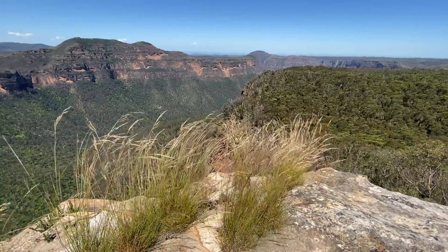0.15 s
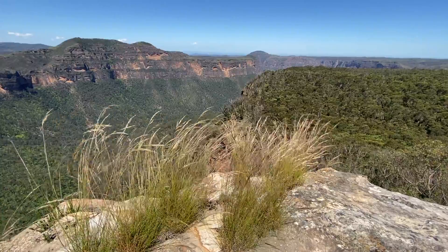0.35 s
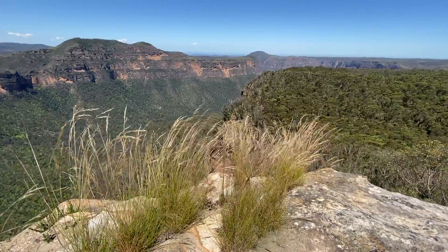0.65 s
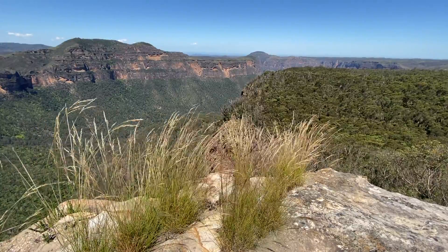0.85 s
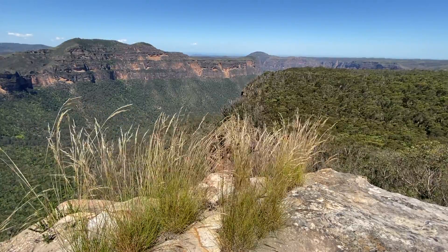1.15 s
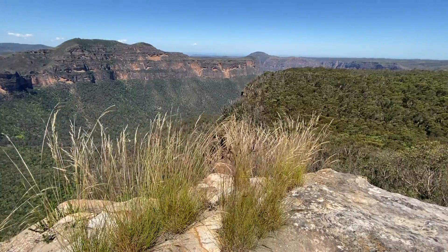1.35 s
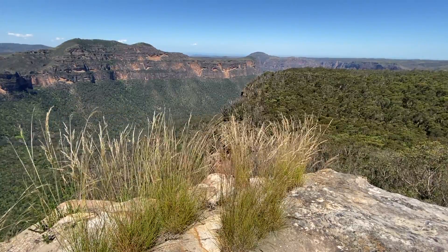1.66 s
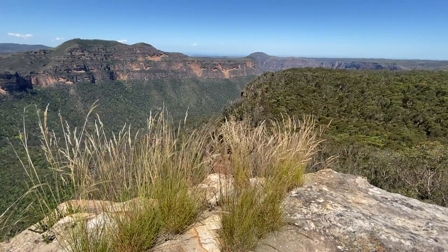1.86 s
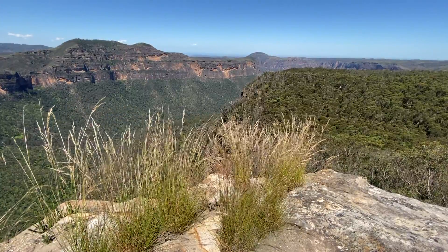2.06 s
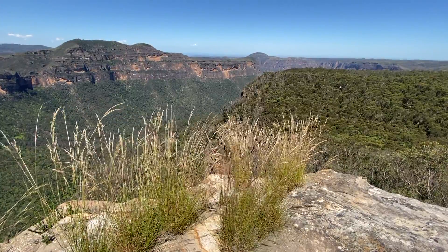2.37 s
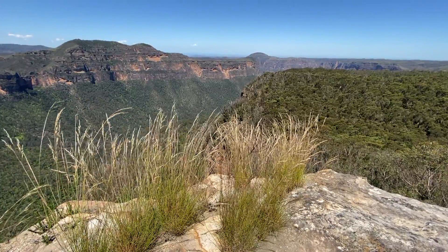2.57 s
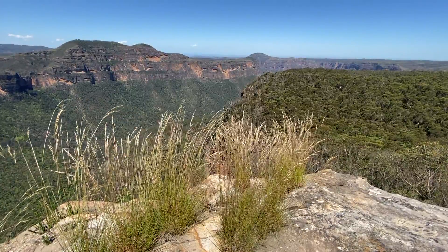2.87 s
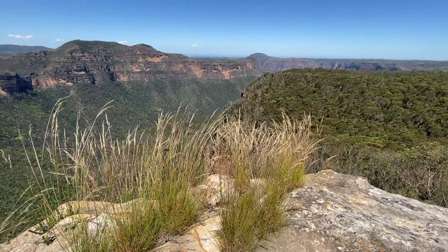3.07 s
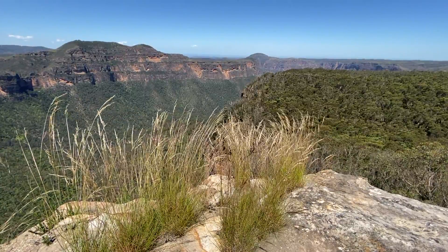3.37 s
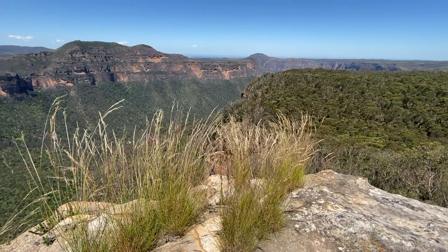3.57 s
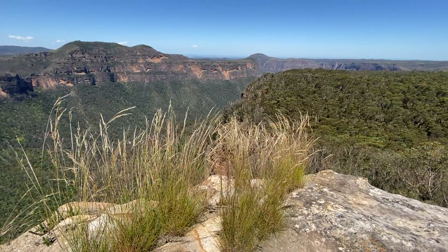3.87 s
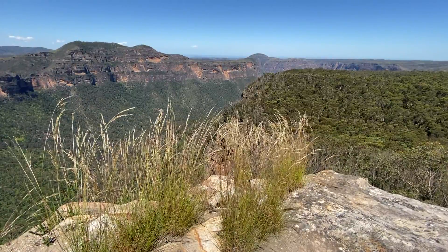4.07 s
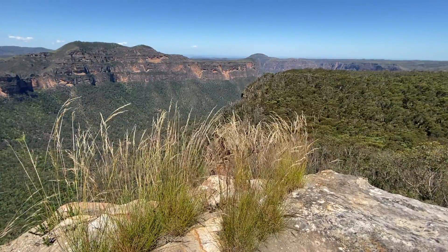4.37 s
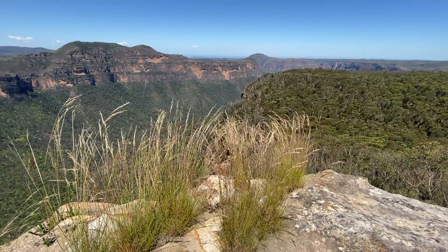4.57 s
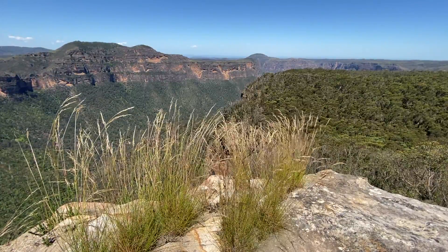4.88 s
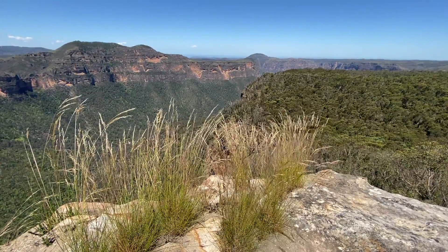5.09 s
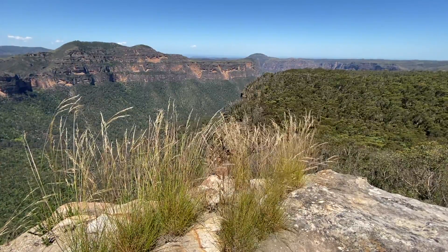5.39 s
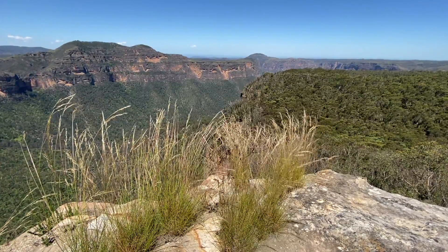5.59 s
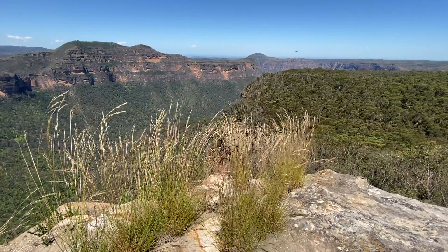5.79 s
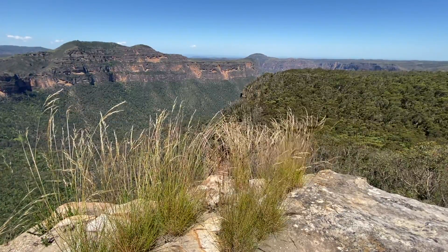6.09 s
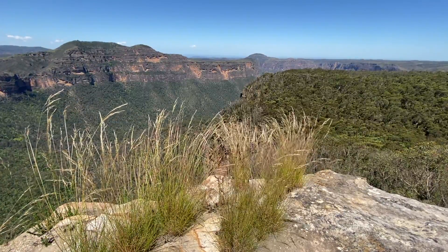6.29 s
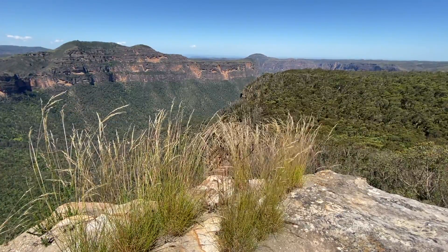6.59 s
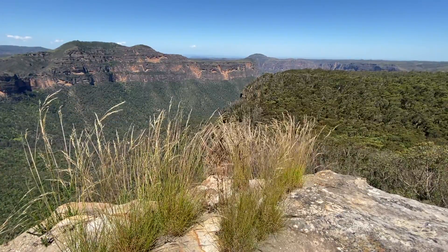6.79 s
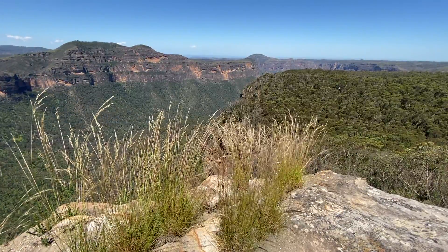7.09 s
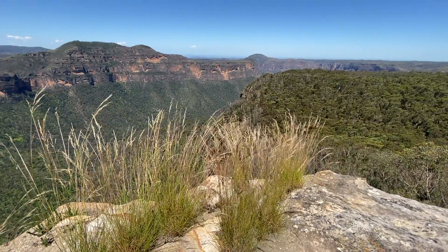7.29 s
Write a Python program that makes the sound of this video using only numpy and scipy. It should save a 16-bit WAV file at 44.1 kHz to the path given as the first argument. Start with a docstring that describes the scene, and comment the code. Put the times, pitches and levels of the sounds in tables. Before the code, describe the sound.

Outdoor stereo insect ambience in open air: sharp metallic cicada rasps near the left, brief at first and drawn out after the middle, with a softer cicada replying between them. Thin rhythmic katydid hiss stays above, distant insects shimmer below. Wind is light at first, then buffets the microphone in low uneven thumps, strongest around the middle, easing later with a few returning puffs.

```python
"""A cicada close by, louder on the left, sings short phrases and then long ones, heard from a clifftop
above a forested valley. A katydid in the grass lisps five times a second, very high; a chorus in the trees
swells and ebbs over a far drone, and a second cicada answers in the pauses. The cicadas are trains of ringing
clicks, the katydid is noise cut into file teeth. Wind, as shaped noise and short swings of pressure, rumbles,
flaps and thumps on the two microphone ports. Faint whistles, lone clicks and a passing fly come later."""
import sys
import numpy as np
from scipy import signal
from scipy.fft import rfft, irfft
from scipy.io import wavfile
from scipy.ndimage import uniform_filter1d

SR = 44100
rng = np.random.default_rng(int(sys.argv[2]) if len(sys.argv) > 2 else 0)


def unload_audio(sound):
    """Save the sound as a 16-bit wav file, at the path given as the first command line argument."""
    columns = np.transpose(np.atleast_2d(sound))
    # keep every value between -1 and 1, then stretch to whole-number steps
    steps = np.round(np.clip(columns, -1, 1) * 32767)
    wavfile.write(sys.argv[1], SR, steps.astype(np.int16))


N = 328545
T = np.arange(N) / SR  # time of each sample, s

# click pace of the near cicada, before its drag and unevenness: [t/s, rate/clicks per s]
CLICK_PACE = [(0, 194), (.45, 192), (1, 196), (1.5, 194.5), (2.05, 194.5), (2.55, 197), (4.65, 196.5),
              (4.95, 189), (5.75, 184), (5.88, 187), (6.301, 187), (6.6, 183.5), (7.45, 186.5)]


def undb(db):
    """Decibels to gain."""
    return 10 ** (np.asarray(db) / 20)


def unit(x):
    """Scale to rms 1."""
    return x / np.sqrt(np.mean(x ** 2))


def curves(table):
    """Each column of a table, joined by straight lines in time."""
    s, *columns = np.transpose(table)
    return [np.interp(T, s, c) for c in columns]


def colour(x, points):
    """Shape a sound by an outline of (f/Hz, level/dB), falling away beyond both ends; rms 1."""
    hz, db = np.transpose(points)
    f = np.maximum(np.fft.rfftfreq(N, 1 / SR), 1)
    skirt = np.minimum(f / hz[0], 1) ** 2 * np.minimum(hz[-1] / f, 1) ** 10
    outline = undb(np.interp(np.log(f), np.log(hz), db))
    return unit(irfft(rfft(x) * skirt * outline, N))


def walk(rate):
    """Random levels held 1 / rate s and smoothed twice; rms 1."""
    k = max(int(SR / rate), 2)
    steps = np.repeat(rng.standard_normal(N // k + 1), k)
    return unit(uniform_filter1d(uniform_filter1d(steps, k), k)[:N])


def drift(chance, size):
    """Smooth a run of random values twice over size steps; rms 1."""
    return unit(uniform_filter1d(uniform_filter1d(chance, size), size))


def stereo_noise(likeness):
    """Two noises with the given correlation."""
    mid, side = rng.standard_normal((2, N))
    c = np.clip(likeness, -1, 1)
    return (np.sqrt(1 + c) * mid + np.sqrt(1 - c) * np.array([side, -side])) / np.sqrt(2)


def pan(x, balance_db):
    """Tip a sound to the left by left minus right dB, keeping its power."""
    gains = np.array([undb(balance_db / 2), undb(-balance_db / 2)]).reshape(2, -1)
    return x * gains / np.sqrt(np.mean(gains ** 2, axis=0))


def ports(x, lag):
    """The sound reaches the left port lag samples after the right."""
    left, right = np.broadcast_to(x, (2, N))
    delay = np.exp(-2j * np.pi * lag * np.fft.rfftfreq(N))
    return np.array([irfft(rfft(left) * delay, N), right])


def clicks(times, sizes, size=8):
    """Impulses placed between samples by a windowed sinc."""
    at = np.asarray(times)[:, None] * SR
    index = at.astype(int) + np.arange(1 - size, size + 1)
    window = np.sinc((index - at) / size)
    taps = np.sinc(index - at) * window * np.asarray(sizes)[:, None]
    inside = (index >= 0) & (index < N)
    return np.bincount(index[inside], taps[inside], N)


def scatter(x, t60):
    """Diffuse returns from rock and foliage, unrelated at the two ports, dying 60 dB in t60 s."""
    t = T[:int(t60 * SR)]
    tail = rng.standard_normal((2, len(t))) * np.exp(-np.log(1000) * t / t60)
    return np.array([unit(signal.fftconvolve(x, h)[:N]) for h in tail]) * np.std(x)


def surge_db():
    """Brief surges of effort: they raise the near cicada's level and the pitch of both cicadas."""
    # surges: [t/s, half length/s, rise/dB]
    surges = [(0.323, 0.11, 1.5), (4.665, 0.18, 3.5), (5.713, 0.27, 2), (6.712, 0.13, 4)]
    return sum(db * np.exp(-((T - s) / width) ** 2) for s, width, db in surges)


def tymbals(start, end, db, pace=1, slow=.13, warm_s=.06, limp=0.0165, first_limp=0.252, settle_s=0.0423,
            tire=0.032, tire_s=.07, jitter=0.0025, weak_db=-0.8, scatter_db=0.84, stutter_s=.03,
            shy_db=-2.5, fade_db=-1.5, count=400):
    """One phrase as rows (s, size, side): two tymbals buckle in turn, halting, then fast, then tiring."""
    pace_wander, limp_wander = .0045, .018  # share of a click period
    chance, k = rng.standard_normal((count, 4)), np.arange(count)
    s, rate = np.transpose(CLICK_PACE)
    age, side = k / rate.mean(), k % 2
    warming = np.exp(-age / warm_s)
    tired = np.exp(np.minimum(start + age - end, 0) / tire_s)
    drag = slow * warming + tire * tired + pace_wander * drift(chance[:, 2], size=10)
    # the lag between the tymbals groups the clicks in pairs
    lag = limp + first_limp * np.exp(-age / settle_s) + limp_wander * drift(chance[:, 3], size=16)
    uneven = lag * (-1) ** k
    period = (1 + drag + uneven + jitter * chance[:, 0]) / np.interp(start + age, s, rate * pace)
    times = start + np.cumsum(period) - period[0]
    # at first the second tymbal misses about half its turns
    caught = (age > stutter_s) | (side == 0) | (rng.random(count) < .5)
    level_db = db + shy_db * warming + fade_db * tired + weak_db * side + scatter_db * chance[:, 1]
    return np.transpose([times, undb(level_db), side])[(times < end) & caught]


def click_ring(t, modes, bloom_s, tuning, order=3):
    """Ring of one tymbal click: the abdomen fills over about two milliseconds, then empties."""
    bloom = (t / bloom_s) ** order * np.exp(-t / bloom_s)
    return bloom * sum(undb(db) * np.sin(2 * np.pi * hz * tuning * t) for hz, db in modes)


def sing(beats, modes, bloom_s, detune, stray=0.0013, bloom_spread=0.045):
    """Two tymbals, tuned a little apart, ring the abdomen; harder clicks ring higher."""
    tension_per_db = 0.0066  # rise in pitch, as a share, for each dB of effort
    times, sizes, side = beats.T[:, :, None]
    chance = rng.standard_normal((len(beats), 2)).T[:, :, None]
    effort_db = 20 * np.log10(sizes) + np.interp(times, T, surge_db())
    tension = tension_per_db * (effort_db - effort_db.mean())
    tuning = 1 + detune * (-1) ** side + tension + stray * chance[0]
    index = np.ceil(times * SR).astype(int) + np.arange(SR // 80)
    bloom = bloom_s * np.exp(bloom_spread * chance[1])  # no two clicks are equally sharp
    rings = click_ring(index / SR - times, modes, bloom, tuning)
    # energy of each click set by its size and the mean click period
    period = SR / np.mean(CLICK_PACE, axis=0)[1]
    rings = rings * sizes * np.sqrt(period / np.sum(rings ** 2, axis=1, keepdims=True))
    inside = (index >= 0) & (index < N)
    return np.bincount(index[inside], rings[inside], N)


def snaps(beats, snap_s=0.0008):
    """Each buckling sheds a millisecond or two of dry crackle."""
    # dry snap of a buckling tymbal: [f/Hz, level/dB]
    snap_colour = [(3150, -13.5), (3430, 1.5), (3650, 1.5), (4000, -7), (4900, -4), (5300, -5.5),
                   (5680, -1.5), (5920, -8), (6300, -14), (6800, -33.5), (7100, -21.5), (7600, -32),
                   (8400, -25), (8900, -20.5), (9500, -39)]
    t = T[:SR // 100]
    power = signal.fftconvolve(clicks(beats[:, 0], beats[:, 1] ** 2), t * np.exp(-t / snap_s))[:N]
    return colour(np.sqrt(np.abs(power)) * rng.standard_normal(N), snap_colour)


def cicada(gain_db=2.0, balance_db=11.0, snap_db=-16, snap_balance_db=2, near_db=-17, far_db=-24):
    """The near cicada: ringing clicks and their dry snaps, with faint returns from the cliff."""
    # phrases, level before gain and surges: [start t/s, end t/s, level/dB]
    phrases = [(-.15, 0.078, -38), (.197, .521, -37), (.809, 1.091, -41.5), (1.343, 1.612, -41),
               (1.859, 2.12, -40.5), (2.375, 2.623, -41), (2.89, 3.146, -41), (3.396, 3.68, -43.5),
               (3.94, 4.201, -41), (4.455, 5.956, -43), (6.08, 6.986, -44.5), (7.075, 7.455, -41.5)]
    # modes that each click rings: [f/Hz, level/dB]
    abdomen_modes = [(3900, -28), (4345, 4), (4640, -26), (5660, -28.5)]
    beats = np.concatenate([tymbals(start, end, db) for start, end, db in phrases])
    song = sing(beats, abdomen_modes, bloom_s=0.00081, detune=0.004)
    crackle = pan(snaps(beats), snap_balance_db) * np.std(song) * undb(snap_db)
    direct = ports(pan(song, balance_db) + crackle, lag=20.3)
    returns = undb(near_db) * scatter(song, t60=0.053) + undb(far_db) * scatter(song, t60=0.29)
    return undb(gain_db + surge_db()) * (direct + pan(returns, balance_db=5.5))


def katydid(gain_db=-2, tooth_hz=460, tooth_s=0.0015, opening_s=0.044, back_db=-14, rest_db=-77, sway_db=1):
    """Each closing wing drags a file over a scraper, swells and stops short; the opening is faint."""
    # closing strokes, level before gain: [end t/s, level/dB]
    strokes = [(0.148, -64), (0.345, -64.0), (0.536, -63), (0.736, -60), (0.924, -60.5), (1.116, -61),
               (1.302, -61.5), (1.508, -60.5), (1.705, -65), (1.9, -61.5), (2.098, -63), (2.302, -63),
               (2.494, -59), (2.687, -61.5), (2.885, -62.0), (3.065, -61.5), (3.261, -63), (3.462, -61.5),
               (3.647, -64.5), (3.854, -63.5), (4.033, -61), (4.23, -63.5), (4.438, -59.5), (4.617, -58),
               (4.821, -63.5), (5.017, -62.5), (5.211, -62), (5.407, -61.5), (5.609, -62.5), (5.802, -62.5),
               (5.977, -65), (6.175, -64.5), (6.378, -63), (6.579, -65.5), (6.773, -63), (6.974, -66),
               (7.17, -66), (7.377, -62.0)]
    # resonance of the wing: [f/Hz, level/dB]
    wing_colour = [(8500, -19), (10000, -6.5), (11700, 0), (13200, 0.5), (14900, 3), (16000, -6.5)]
    swell_s, hold_s, stop_s = 0.078, 0.037, .014
    grip_times = [-hold_s - swell_s, -hold_s, -stop_s / 2, stop_s / 2]
    force = np.full(N, undb(rest_db))
    for end, db in strokes:
        near = np.abs(T - end) < .15
        t = T[near] - end
        closing = np.sin(np.pi / 2 * np.interp(t, grip_times, [0, 1, 1, 0])) ** 2
        opening = undb(back_db) * np.exp(-(t / opening_s - 1) ** 2)
        force[near] += (closing + opening) * undb(db + gain_db)
    phase = np.cumsum(tooth_hz * (1 + 0.1 * walk(300))) / SR % 1
    tooth_decay = np.exp(-phase / tooth_hz / tooth_s)
    teeth = tooth_decay * rng.standard_normal(N) * undb(sway_db * walk(50))
    return ports(colour(teeth, wing_colour) * force, lag=11.7)


def chorus_strength(rest_db=-52, rest_balance_db=1.5, swell_balance_db=5, waver_db=1.1):
    """Strength of the chorus at each port: a steady bed, and swells that come mostly from the left."""
    # swells of the chorus, level before gain: [t/s, half length/s, level/dB]
    swell_table = [(0, 0.091, -45.5), (0.423, 0.29, -48.5), (1.043, 0.22, -49), (1.504, 0.15, -49.5),
                   (1.783, 0.1, -48), (2.376, 0.22, -48.5), (2.98, 0.17, -47), (3.541, 0.17, -46),
                   (4.092, 0.16, -48), (4.723, 0.18, -48.5), (5.36, 0.17, -46), (5.797, 0.18, -48),
                   (6.151, 0.09, -47), (6.447, 0.14, -46.5), (6.73, 0.1, -47), (7.33, 0.36, -47)]
    swell_power = sum(undb(db) ** 2 * np.exp(-((T - s) / width) ** 2) for s, width, db in swell_table)
    bed = pan(undb(rest_db), rest_balance_db)
    swells = pan(np.sqrt(swell_power), swell_balance_db)
    return np.hypot(bed, swells) * undb(waver_db * walk(10))


def chorus(gain_db=1, rate_hz=200, wander=.014, jitter=0.0069, scatter_db=2, blur_db=-2, count=3):
    """Cicadas in the trees: scattered click trains over a noisy blur of still more distant ones."""
    # colour of the chorus: [f/Hz, level/dB]
    chorus_colour = [(2950, -22.5), (3300, -17.5), (3500, -9), (3700, -3.5), (4000, -2), (4400, 1.5),
                     (4650, -1.5), (4850, -8), (5100, -12), (5450, -15.5), (5880, -20), (6300, -28),
                     (6800, -38), (8000, -41), (8800, -37), (9500, -51)]
    voices = 0
    for _ in range(count):
        rate = rate_hz * (1 + .05 * rng.standard_normal() + wander * walk(11))
        turns = np.cumsum(rate) / SR
        beats = np.arange(int(turns[-1]))
        chance = rng.standard_normal((len(beats), 2))
        times = np.interp(beats + jitter * chance[:, 0], turns, T)
        train = clicks(times, undb(scatter_db * chance[:, 1]))
        voices = voices + scatter(train, t60=.015)
    voices = unit(voices) + undb(blur_db) * stereo_noise(likeness=0.074)
    return colour(voices, chorus_colour) * chorus_strength() * undb(gain_db)


def valley(drone_db=-60.5, air_db=-68.0, peak_s=4.0, swell_s=2.05, swell_db=2.0, air_rise_db_per_s=0.47):
    """The far insect drone goes through one gentle swell; the soft rush of the forest slowly grows."""
    # steady drone of insects far down the valley: [f/Hz, level/dB]
    drone_colour = [(900, -17), (1250, -15), (1450, -3), (1660, 1.5), (2050, -4.5), (2350, -3), (2900, -9),
                    (3500, -48), (5000, -72)]
    # air moving over the forest: [f/Hz, level/dB]
    air_colour = [(20, -36), (60, -21), (190, 3.5), (310, 2), (450, -9), (800, -16), (2000, -22),
                  (7000, -44), (15000, -18)]
    swell = swell_db * np.exp(-((T - peak_s) / swell_s) ** 2)
    drone_level_db = drone_db + swell + 1.0 * walk(2.195) + .5 * walk(25)
    drone = colour(ports(stereo_noise(likeness=0.37), lag=-6), drone_colour) * undb(drone_level_db)
    air_level_db = air_db + air_rise_db_per_s * T + 0.23 * walk(2.0)
    air = colour(stereo_noise(likeness=0.13), air_colour) * undb(air_level_db)
    return pan(drone, balance_db=2.5) + pan(air, balance_db=5.5)


def airflow(breeze_flutter_db=-17, breeze_balance_db=1, breeze_likeness=-0.57):
    """Rumble and flutter strength at each port, and their likeness: gusts strike, sag and die on the breeze."""
    # breeze between the gusts: [t/s, level/dB]
    breeze_table = [(0, -64.5), (.8, -72.5), (1.35, -65), (1.7, -50), (3, -52), (3.13, -52), (3.4, -44.5),
                    (4.08, -52.5), (4.88, -53.5), (5.15, -62.5), (5.7, -65), (6.6, -49.5), (7.03, -65),
                    (7.25, -59), (7.45, -65)]
    # gusts on the ports, levels before gain:
    # [start t/s, length/s, rumble level/dB, flutter level/dB, left minus right/dB, likeness of ports (-1 to 1)]
    gusts = [(0.169, 0.2, -48.5, -59.5, 0.5, -0.9), (0.867, 0.063, -51.5, -85, 9, .8),
             (1.459, 0.24, -50, -80, 3, -0.026), (1.741, .13, -35.5, -45.5, 0.5, -1),
             (2.07, 0.05, -42.5, -69, 4, .3), (2.164, 0.14, -44, -65, 6, -0.37),
             (2.401, 0.027, -50, -72, 8, 0.39), (2.604, 0.075, -50.5, -76, 0, 0.045),
             (2.83, .07, -44.5, -75, -0.5, -0.78), (3.295, 0.053, -44, -64, 5, -0.15),
             (3.393, 0.12, -45, -63, 4, -.3), (3.618, 0.17, -40, -47.5, 3, -0.14),
             (3.8, 0.062, -36.5, -49.5, 3.5, -0.57), (3.952, 0.053, -45.5, -80, -0.5, -0.69),
             (4.2, 0.22, -36, -51, 3.5, -0.74), (4.469, 0.22, -39, -51, 0.5, -0.96),
             (4.744, 0.13, -43.5, -52.5, 1, -1.02), (5.21, 0.059, -52.5, -71, -3, -.2),
             (5.443, 0.19, -57, -82, -0.5, -0.78), (5.849, 0.089, -50.5, -66, 4, -0.44),
             (5.989, 0.033, -51.5, -68, 1, -.5), (6.122, 0.079, -50, -60.5, 2, -0.55),
             (6.36, 0.26, -65, -59, -1, -0.32), (6.628, 0.11, -44.5, -62, 2.5, -.4),
             (6.811, .04, -50.5, -72, 1, -0.52), (7.214, 0.17, -53, -70, 5.5, -0.25)]
    attack_s, release_s, sag_db_per_s = 0.0099, 0.021, 13.5
    breeze = pan(undb(curves(breeze_table)[0]), breeze_balance_db)
    large, small = breeze ** 2, (breeze * undb(breeze_flutter_db)) ** 2
    shared = breeze_likeness * large
    for start, length, rumble_db, flutter_db, balance_db, likeness in gusts:
        age = T - start
        shape = np.exp(np.minimum(age, 0) / attack_s - np.maximum(age - length, 0) / release_s)
        sag = undb(-sag_db_per_s * np.clip(age, 0, length))
        power = pan(shape * sag, balance_db) ** 2
        rumble = power * undb(rumble_db) ** 2
        large = large + rumble
        small = small + power * undb(flutter_db) ** 2
        shared = shared + likeness * rumble
    return np.sqrt(large), np.sqrt(small), shared.sum(axis=0) / large.sum(axis=0)


def even(x, seconds):
    """Hold the strength of a turbulent flow steady over the given time."""
    k = max(int(seconds * SR), 2)
    return x / np.sqrt(uniform_filter1d(uniform_filter1d(np.mean(x ** 2, axis=0), k), k))


def wind(rumble_db=0.0, flutter_db=-2, churn_db=2.5, tear_db=4):
    """Eddies press on the ports, mostly in opposite senses: large ones rumble, small ones flutter."""
    # rumble of large eddies: [f/Hz, level/dB]
    rumble_colour = [(20, -38), (35, -8.5), (55, 2.5), (85, -1), (120, -6.5), (190, -10.5), (330, -29),
                     (700, -44.5)]
    # flutter of small eddies: [f/Hz, level/dB]
    flutter_colour = [(80, -23.5), (170, -2.5), (300, 5.5), (450, -5), (650, -13), (900, -22), (1400, -35)]
    large, small, likeness = airflow()
    rumble = even(colour(stereo_noise(likeness), rumble_colour), seconds=0.044)
    rumble = rumble * undb(rumble_db + churn_db * walk(30))
    eddies = stereo_noise(likeness=-0.66) * undb(tear_db * walk(110))
    flutter = even(colour(eddies, flutter_colour), seconds=0.036) * undb(flutter_db)
    return rumble * large + flutter * small


def eddies_passing(table, cycles, opposite):
    """A passing eddy is one short swing of pressure, which the other port feels nearly reversed."""
    out = np.zeros((2, N))
    for s, db, hz, balance_db in table:
        near = np.abs(T - s) < .06
        turns = (T[near] - s) * hz
        phase = rng.uniform(0, 2 * np.pi) + np.array([[0], [np.pi * opposite]])
        swing = np.exp(-(turns / cycles) ** 2) * np.cos(2 * np.pi * turns + phase)
        out[:, near] += pan(swing, balance_db) * undb(db)
    return out


def flaps(gain_db=5):
    """Small single eddies flap on the ports, each a short swing of pressure."""
    # small eddies, peak before gain: [t/s, peak level/dB, centre f/Hz, left minus right/dB]
    flap_table = [(.266, -42.5, 324, 4), (.277, -44, 373, 3.5), (1.747, -41.5, 388, 6),
                  (1.791, -32, 567, 9), (1.817, -32.5, 486, 7), (1.838, -37, 489, 9), (1.851, -34, 507, 8),
                  (2.075, -33.5, 266, 13), (2.198, -40, 193, 17), (3.291, -39, 205.2, 16),
                  (3.688, -38.5, 393, 5), (3.736, -35.5, 260, 1), (3.806, -34, 382, 5.5),
                  (3.84, -38, 295, 8), (4.191, -42, 427, 4), (4.5, -40.5, 280, 2), (4.605, -37.5, 314, 2),
                  (4.636, -39.5, 330, 1), (4.765, -41.5, 350, 1), (4.847, -36, 356, -1),
                  (4.854, -43, 298, 1), (6.658, -42.5, 243, 19)]
    return eddies_passing(flap_table, cycles=0.64, opposite=0.81) * undb(gain_db)


def second_cicada(gain_db=-1, balance_db=8.5, foliage_db=-3):
    """A higher, slightly faster cicada further off, heard partly straight and partly through foliage."""
    # answering phrases, level before gain: [start t/s, end t/s, level/dB]
    answers = [(0.516, 0.78, -53), (1.077, 1.314, -48), (1.58, 1.923, -49.5), (2.09, 2.425, -50.5),
               (2.606, 2.722, -56), (3.128, 3.368, -50), (3.656, 3.881, -50.5), (4.171, 4.421, -47),
               (5.25, 5.46, -50), (5.848, 6.103, -49.5)]
    # modes of its abdomen: [f/Hz, level/dB]
    answer_modes = [(4130, -4.5), (4470, 1), (4690, -4.5)]
    beats = np.concatenate([tymbals(start, end, db, pace=1.07, jitter=0.009, scatter_db=1.0, shy_db=-3.5)
                            for start, end, db in answers])
    song = sing(beats, answer_modes, bloom_s=0.00054, detune=0.0053, stray=.008)
    heard = ports(song, lag=27.5) + undb(foliage_db) * scatter(song, t60=.02)
    return pan(heard, balance_db) * undb(gain_db)


def thumps(gain_db=-1):
    """Large single eddies thump on the ports, each a short, slow swing of pressure."""
    # large eddies, peak before gain: [t/s, peak level/dB, centre f/Hz, left minus right/dB]
    thump_table = [(.876, -35, 60, 17), (.922, -39, 86, 11), (1.62, -38.5, 66, 6), (2.092, -34.5, 90, -1),
                   (2.125, -35, 74.8, 8), (2.418, -33.5, 62, 12), (2.856, -39, 72, 3),
                   (3.298, -31.5, 89, 1), (3.415, -33.5, 58, 7), (3.644, -31, 78, 10), (3.853, -29, 85, 7),
                   (4.212, -31, 77.5, 3), (5.245, -47, 57, 1), (6.0, -38.5, 55.1, 9), (6.16, -40, 62, 1),
                   (6.672, -37, 62, 3), (6.718, -34.5, 66, 0)]
    return eddies_passing(thump_table, cycles=0.86, opposite=0.74) * undb(gain_db)


def bird(wet_db=-2):
    """Two soft upward slurs, probably a bird across the valley: gliding sines with diffuse returns."""
    # rising whistles, level before the returns: [start t/s, length/s, first f/Hz, last f/Hz, level/dB]
    whistles = [(2.075, .135, 820, 1125, -72), (2.18, .065, 733, 856, -71)]
    song = np.zeros(N)
    for start, length, first_hz, last_hz, db in whistles:
        part = np.clip((T - start) / length, 0, 1)
        phase = 2 * np.pi * np.cumsum(first_hz * (last_hz / first_hz) ** part) / SR
        song = song + undb(db) * np.sin(np.pi * part) * np.sin(phase)
    return song + undb(wet_db) * scatter(song, t60=0.27)


def ticks(hz=4300, ring_s=0.00099, balance_db=5):
    """Lone sharp insect clicks that stand out of the chorus, each a millisecond or two of ringing."""
    # lone clicks, level before panning: [t/s, peak level/dB]
    tick_table = [(2.92, -31), (2.943, -35), (5.376, -34), (5.419, -31), (5.549, -34)]
    t = T[:SR // 100] - .005  # centred on the click
    ring = np.exp(-(t / ring_s) ** 2) * np.sin(2 * np.pi * hz * t)
    s, db = np.transpose(tick_table)
    return pan(signal.fftconvolve(clicks(s, undb(db)), ring, "same"), balance_db)


def fly(gain_db=-3):
    """A fly going by: the harmonics of a wavering wingbeat faintly come and go."""
    # flight, level before gain: [t/s, wingbeat f/Hz, level/dB]
    flight = [(6.2, 290, -100), (6.31, 286, -71), (6.38, 274.3, -63.5), (6.48, 288.5, -70),
              (6.57, 277, -79), (6.63, 298, -78), (6.75, 301, -100)]
    # harmonics of the wingbeat: [multiple of wingbeat, level/dB]
    harmonics = [(1, 1), (2, -4), (3, -8), (4, -13.5), (5, -6)]
    hz, db = curves(flight)
    phase = 2 * np.pi * np.cumsum(hz * (1 + 0.012 * walk(40))) / SR
    buzz = unit(sum(undb(level) * np.sin(k * phase) for k, level in harmonics))
    return pan(buzz * undb(db + gain_db), balance_db=3)


def scene():
    """Insects near and far and a distant bird, with wind on the microphone."""
    insects = cicada() + katydid() + chorus() + second_cicada() + ticks() + fly()
    gusty_wind = wind() + flaps() + thumps()
    return insects + valley() + bird() + gusty_wind


def record(dry):
    """The recorder drops the deepest rumble below 28 Hz and cuts the top above 15.7 kHz."""
    low_cut = signal.butter(2, 28, "high", fs=SR, output="sos")
    top_cut = signal.ellip(10, .1, 80, 15700, fs=SR, output="sos")
    return signal.sosfilt(top_cut, signal.sosfilt(low_cut, dry))


dry = scene()
out = record(dry)
unload_audio(out)
```